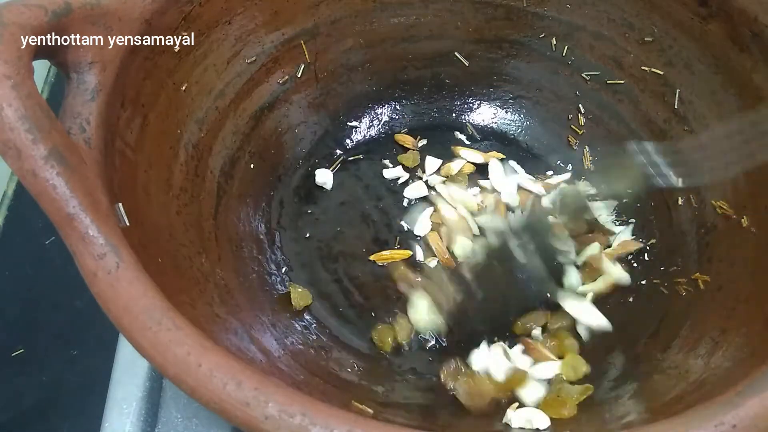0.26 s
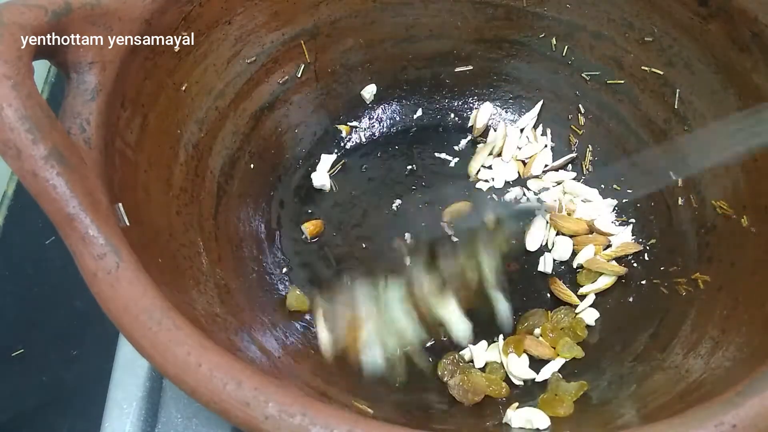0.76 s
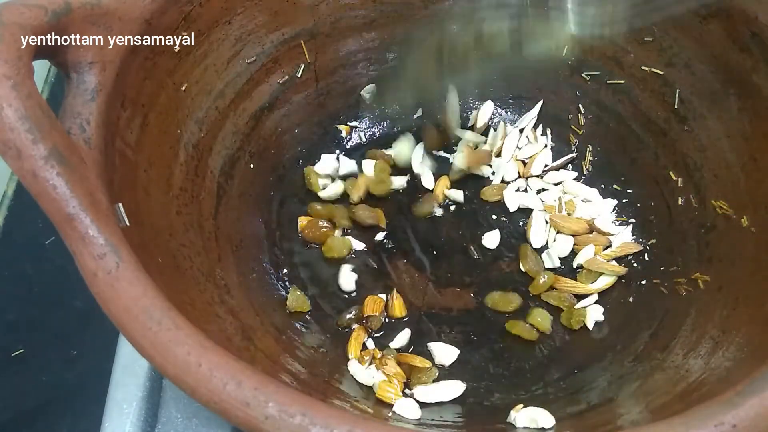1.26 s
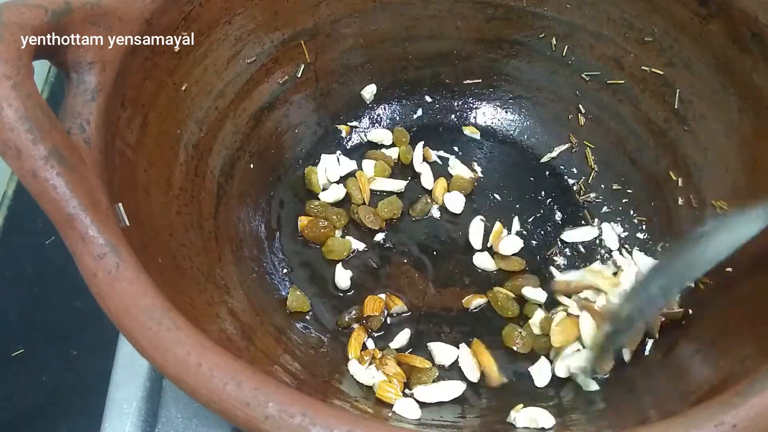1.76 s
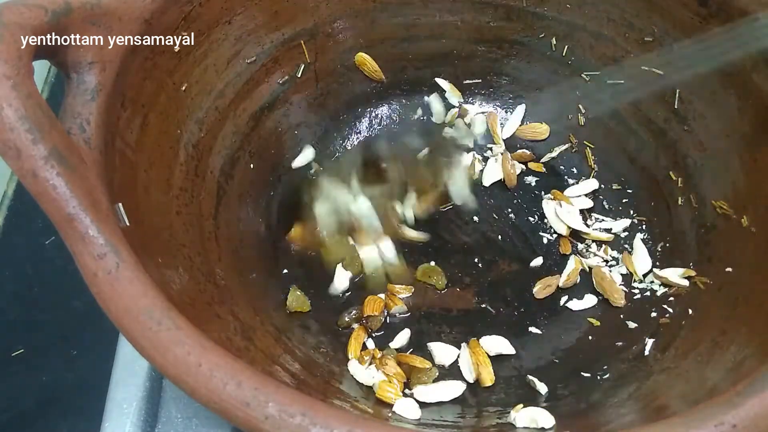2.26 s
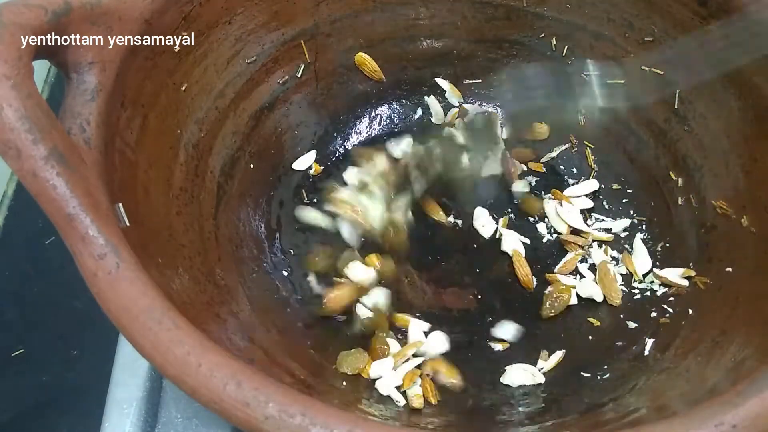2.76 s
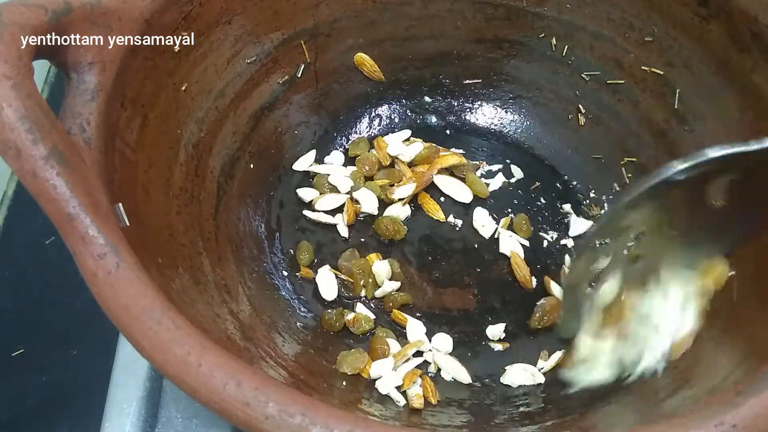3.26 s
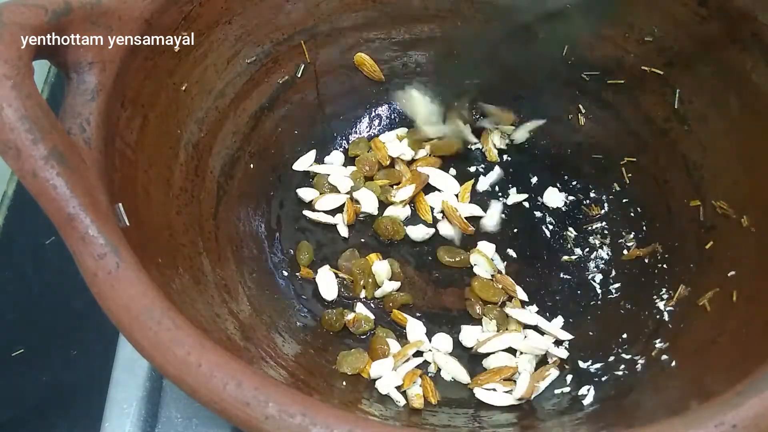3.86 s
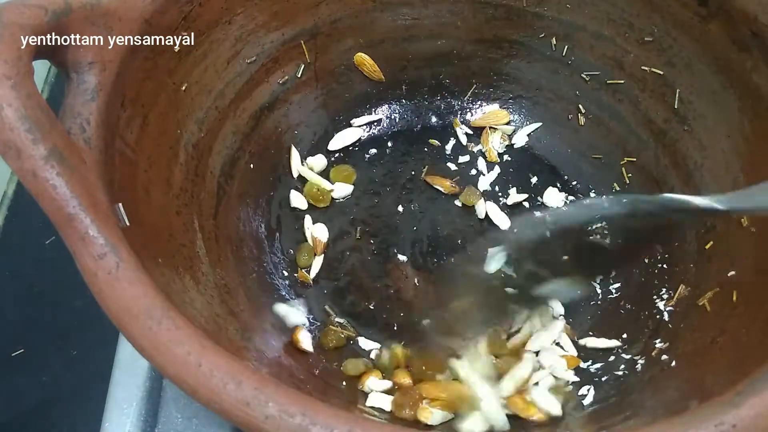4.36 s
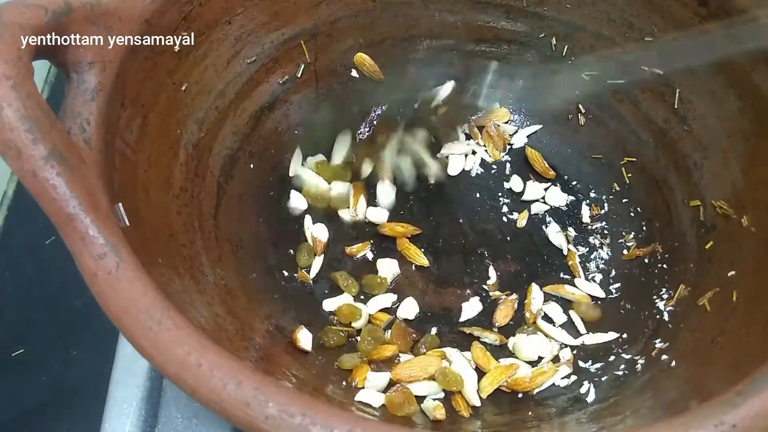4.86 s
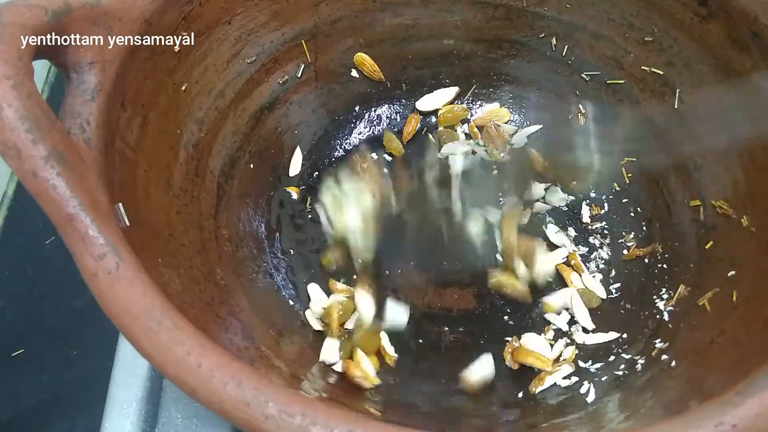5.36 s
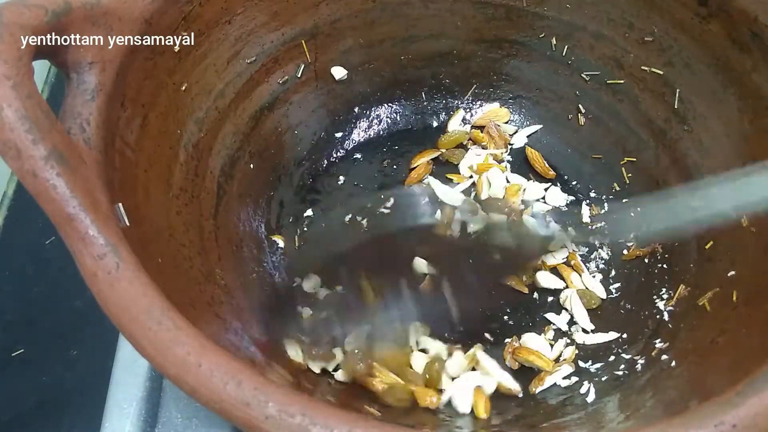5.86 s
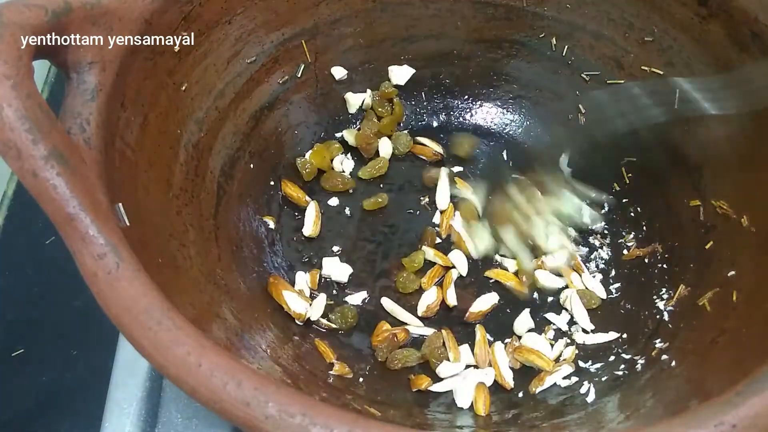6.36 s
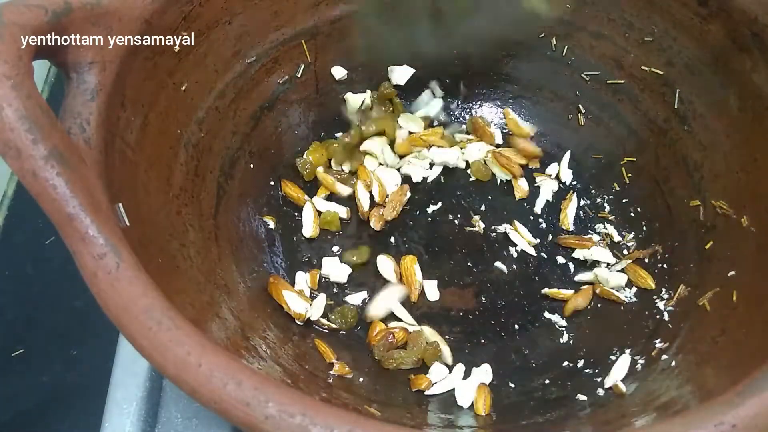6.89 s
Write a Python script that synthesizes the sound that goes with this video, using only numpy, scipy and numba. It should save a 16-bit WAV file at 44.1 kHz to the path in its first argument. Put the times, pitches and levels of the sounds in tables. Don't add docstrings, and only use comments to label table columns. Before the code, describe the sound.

A metal spoon knocks and scrapes grittily around a clay pot in quick steady strokes, nuts ticking and tumbling over a faint burner flame.

```python
import sys
import numpy as np
from scipy import signal
from scipy.fft import rfft, irfft, next_fast_len
from scipy.io import wavfile
from scipy.ndimage import uniform_filter1d
from numba import njit

SR = 44100
rng = np.random.default_rng(int(sys.argv[2]) if len(sys.argv) > 2 else 0)


def elevation(decibels):
    levels = np.asarray(decibels, float)
    return 10 ** (levels / 20)


def bounce(signal):
    frames = np.transpose(np.atleast_2d(signal))
    limited = np.clip(frames, -1, 1)
    pcm = np.round(limited * 32767).astype(np.int16)
    wavfile.write(sys.argv[1], SR, pcm)


N = 314433
SIZE = next_fast_len(N + SR)
HZ = np.maximum(np.arange(SIZE // 2 + 1) * SR / SIZE, 1)

# (time [s], glaze [dB], pot [dB], spoon ring [dB], clack [Hz])
KNOCKS = [(0.4413, -26, -33, -43.5, 1930), (0.7651, -25, -36.5, -40.5, 2830),
          (0.7773, -30.5, -42, -41.5, 3050), (0.8481, -34.5, -31.5, -42, 3380),
          (1.158, -26.5, -38, -48.5, 3220), (1.5471, -24, -38, -32, 2780),
          (1.6407, -23.5, -35, -49.5, 1940), (2.0569, -38, -37, -43.5, 3700),
          (2.368, -38.5, -52, -47, 3550), (2.784, -21, -32, -65, 3520), (3.3488, -32, -38, -47, 3450),
          (3.3706, -26.5, -39, -43.5, 3380), (3.762, -22, -38, -51, 3120),
          (4.2279, -59.5, -55, -53.5, 3700), (4.2393, -36, -41.5, -45, 2850),
          (4.742, -27.5, -33.5, -37, 3370), (5.0181, -30.5, -39, -38, 5460),
          (5.4008, -24.5, -37, -42.5, 3180), (5.7686, -28, -42, -37, 2660), (5.838, -44, -46, -43.5, 3100),
          (6.112, -28, -34, -63, 3450), (6.4626, -30.5, -37.5, -45, 2750), (6.5072, -25, -32, -48, 2430),
          (6.8349, -23.5, -38.5, -64, 3460)]
# (time [s], glaze [dB], bottom [dB], wall [dB], clack [Hz])
BUMPS = [(0.0306, -35, -58, -46, 5560), (0.0605, -36, -48, -46, 5600), (0.097, -33, -59, -33, 3250),
         (0.1103, -49, -58, -43, 3540), (0.122, -38, -39, -48, 2720), (0.818, -39, -63, -65, 5400),
         (0.9048, -51, -35, -43.5, 2900), (2.389, -36, -40, -48, 3210), (2.4071, -44, -47, -39.5, 5700),
         (2.4862, -35, -60, -47, 3780), (2.5145, -36.5, -34.5, -39, 3540),
         (2.5244, -39.5, -38, -45.5, 3300), (3.8836, -37.5, -45, -62, 3000),
         (4.3255, -48.5, -38, -38.5, 2820), (4.3347, -38, -56, -37.5, 2700), (5.0301, -34, -46, -52, 3750),
         (5.146, -37, -48, -37, 3680), (5.1527, -41, -39, -54, 3430), (5.5093, -42, -54, -59, 5580),
         (6.4841, -37.5, -35, -47.5, 2850), (6.9041, -39, -35.5, -42.5, 1830),
         (1.57, -39, -46, -46.5, 3470), (3.36, -35, -46, -43.5, 5140), (3.3847, -43, -45, -38.5, 3180)]
# (time [s], level [dB], clack [Hz])
TICKS = [(0.2695, -43.5, 3500), (0.313, -50.5, 3475), (0.332, -51.5, 3530), (0.8947, -47, 2850),
         (1.4878, -55, 3370), (1.9875, -51, 3440), (2.207, -41.5, 3120), (2.3201, -48, 3180),
         (2.473, -42, 3960), (2.5916, -48, 3260), (3.0424, -52.5, 3300), (3.244, -61.5, 3550),
         (4.0694, -50, 2960), (4.1, -53.5, 3070), (4.1228, -51, 3200), (4.36, -37, 3120),
         (4.6246, -45, 3170), (5.2605, -46, 3330), (6.0217, -51, 2900), (6.761, -55, 3040),
         (1.1744, -36.5, 3220), (3.0702, -59, 3440), (3.1512, -71, 3470), (4.588, -57, 3390),
         (4.715, -40.5, 5550), (5.8637, -43.5, 2990), (6.1301, -41.5, 3260), (6.9147, -43, 3430)]
BUMP_RING_DB, TICK_BOTTOM_DB, TICK_WALL_DB, TICK_RING_DB = -17, -21.5, -14, -24.5

# (hardest [s], lifted [s], bottom [dB], wall [dB], glaze [dB])
STROKES = [(0.054, 0.35, -43.5, -39, -46), (0.488, 0.71, -50.5, -46, -50.5), (0.9, 1.084, -50, -46.5, -51),
           (1.162, 1.384, -55.5, -48, -45.5), (1.69, 1.93, -56, -51, -57),
           (2.081, 2.287, -56.5, -49.5, -53.5), (2.51, 2.735, -50, -47, -52.5),
           (2.88, 3.094, -56.5, -55.5, -55.5), (3.42, 3.584, -56, -51.5, -55.5),
           (3.912, 4.13, -53.5, -48, -53), (4.324, 4.523, -48.5, -44, -50.5),
           (4.748, 5.01, -51.5, -42.5, -45), (5.156, 5.374, -46, -43.5, -52),
           (5.549, 5.774, -57.5, -51.5, -56.5), (5.88, 6.05, -57, -52.5, -56),
           (6.163, 6.42, -48.5, -49.5, -56), (6.519, 6.77, -57, -49, -56), (6.917, 7.107, -53.5, -51, -51)]
# (from [s], to [s], first level [dB], last level [dB], steel edge [dB])
ROLLS = [
    (0.365, 0.432, -82, -53.5, -5),
    (1.97, 2.058, -71.5, -70, -3),
    (2.313, 2.361, -67, -77, 2),
    (3.15, 3.24, -73, -85, -2),
    (3.24, 3.355, -79.5, -73, 5.5),
    (4.619, 4.737, -72, -58, -5),
]
# (bottom, wall, glaze, steel edge [dB/s])
SWELL_DB_PER_S = [34, 45, 17, 15]
# (bottom, wall, glaze, steel edge [dB/s])
FADE_DB_PER_S = [83, 94, 85.5, 114]
# (bottom, wall, glaze, steel edge [dB])
SKID_DB = [-10.5, -8.5, -19, 0]
# (bottom, wall, glaze [dB])
ROLL_DB = [4, -2, -1.5]
LIFT_DB_PER_S, SKID_T60_S, EDGE_DB = 355, 0.11, -5.5
LEAD_DB, LEAD_T60_S = -27.5, 0.015

# (time [s], level [dB], fade [dB/s])
SINGS = [
    (0.885, -51.5, 86),
    (1.165, -52.5, 116),
    (2.062, -56, 100),
    (2.79, -48, 130),
    (4.335, -49, 99),
    (4.751, -37, 115),
    (5.405, -52, 120),
    (6.118, -48, 140),
]
SING_RISE_S = 0.0062

# (frequency [Hz], level [dB], t60 [s])
BOTTOM_MODES = [(244, -2.5, 0.25), (330, -3, 0.11), (409, -6, 0.027), (463, 4, 0.07), (529.5, 10, 0.038),
                (633, 10.5, 0.025), (703.5, 6.5, 0.023), (808.7, -3.5, 0.053)]
# (frequency [Hz], level [dB], t60 [s])
WALL_MODES = [(1060, -5, .05), (1143, 0, .09), (1200, -3, .05), (1380, -6, .03), (1860, -5, .02),
              (2100, -1, .035), (2240, -3, .03)]
# (frequency [Hz], level [dB], t60 [s])
GLAZE_MODES = [(2900, 0.5, 0.021), (3260, 0.5, 0.026), (3420, -1, 0.015), (3750, -3.5, 0.0072),
               (4820, -0.5, 0.0068), (5220, -6, .012), (5650, 6, 0.023)]
# (frequency [Hz], level [dB], t60 [s])
SPOON_MODES = [(6950, 0, .11), (7270, -1, .11), (7600, -4, .08), (8220, -6, .08), (8800, -8, .05),
               (9070, -4, .09), (10100, -12, .05), (10350, -10, .06), (10720, -8, .08), (11570, -14, .06),
               (12280, -13, .06), (12670, -15, .06), (13150, -15, .06), (13900, -11, .05), (14900, -8, .05),
               (15400, -5, .05)]

# (frequency [Hz], t60 [s])
KITCHEN_T60 = [(100, 0.8), (500, 0.45), (2000, 0.58), (6000, 0.31), (14000, 0.31)]
# (frequency [Hz], density [dB/Hz])
BURNER_ROAR = [(30, -19.5), (90, -31.5), (130, -15.5), (200, -17.5), (500, -27.5), (1500, -12.5),
               (4000, -31), (15000, -26)]
# (frequency [Hz], width [Hz], level [dB])
BURNER_DRONE = [(137, 9, -1.5), (180, 9, -3)]
BURNER_DB = -5.5
FLAME_DB, FLAME_KNEE_DB, FLAME_SLOPE, FLAME_RISE_S, FLAME_FALL_S = -68.5, -52, 0.41, 0.095, 0.03

# (frequency [Hz], difference [dB])
PORT_BALANCE = [(100, 1.5), (300, 0.5), (520, 6), (1000, -4.5), (2100, -3), (3000, -2), (5500, 1),
                (7000, -8), (11000, -2.5), (15000, -7)]
# (frequency [Hz], share [0-1])
PORT_ALIKE = [(60, 0.6), (150, 0.85), (500, 0.65), (1200, 0.25), (3000, 0.03), (8000, 0), (15000, 0)]
# (frequency [Hz], gain [dB])
PORT_COLOUR = [(50, 22.5), (130, 3.5), (230, 1), (500, -0.5), (1100, -1), (1700, -5), (2300, -2), (4000, 1),
               (6500, -3), (10000, -2), (15500, -19)]
# (frequency [Hz], share [0-1])
WIDEN = [(100, 0.19), (1100, 0.91), (2300, 0.78), (4560, 0.55), (8000, 0.26), (15000, 0)]
WIDEN_S, PORT_LAG_S, TOP_HZ = 1 / 2280, 13 / SR, 15750


def along(points):
    hz, value = np.transpose(points)
    return np.interp(np.log(HZ), np.log(hz), value)


def unit(x):
    return x / np.sqrt(np.mean(x ** 2))


def per_body(values):
    return np.array(values)[:, None]


@njit
def follow(x, rise, fall):
    out, level = np.empty(len(x)), x[0]
    for i in range(len(x)):
        level += (x[i] - level) * (rise if x[i] > level else fall)
        out[i] = level
    return out


def decay(x, t60_s):
    return signal.lfilter([1], [1, -elevation(-60 / (t60_s * SR))], x)


def blows():
    rows = [(s, hz, pot, pot, glaze, steel) for s, glaze, pot, steel, hz in KNOCKS]
    rows += [(s, hz, bottom, wall, glaze, glaze + BUMP_RING_DB) for s, glaze, bottom, wall, hz in BUMPS]
    rows += [(s, hz, db + TICK_BOTTOM_DB, db + TICK_WALL_DB, db, db + TICK_RING_DB) for s, db, hz in TICKS]
    return np.transpose(rows)


def knocks(chatter_s=0.00053, clack_db=9, clack_width_hz=500):
    s, clack_hz, *db = blows()
    t = np.arange(400) / SR
    spread = rfft(rng.standard_normal((len(s), len(t))) * t * np.exp(-t / chatter_s))
    spread /= np.sqrt(uniform_filter1d(np.abs(spread) ** 2, size=9))
    hz = np.arange(spread.shape[1]) * SR / len(t)
    off = 2j * (hz - clack_hz[:, None]) / clack_width_hz
    flat = irfft(spread, len(t))
    clack = irfft(spread * (1 + elevation(clack_db) / (1 + off)), len(t))
    share = elevation(np.array(db) + per_body([19.5, 25.5, 14, 26.5]))
    force = np.zeros((4, N + len(t)))
    for k, start in enumerate((s * SR).astype(int)):
        contact = np.array([flat[k], clack[k], clack[k], flat[k]])
        force[:, start:start + len(t)] += share[:, k:k + 1] * contact
    return force[:, :N]


def pressure():
    t = np.arange(N) / SR
    s, _, *db = blows()
    skid = np.zeros((4, N))
    skid[:, (s * SR).astype(int)] = elevation(np.array(db) + per_body(SKID_DB))
    power = decay(skid, SKID_T60_S) ** 2 + elevation(-220)
    lead = decay(skid[:, ::-1], LEAD_T60_S)[:, ::-1]
    power += (elevation(LEAD_DB) * lead) ** 2
    lands = np.array(KNOCKS)[:, 0]
    start = 0
    for hardest, lift, bottom, wall, glaze in STROKES:
        on = slice(int(start * SR), int((lift + 0.25) * SR))
        late = t[on] - hardest
        fall = per_body(FADE_DB_PER_S) * np.maximum(late, 0)
        fall -= per_body(SWELL_DB_PER_S) * np.minimum(late, 0)
        fall += LIFT_DB_PER_S * np.maximum(t[on] - lift, 0)
        power[:, on] += elevation(2 * (per_body([bottom, wall, glaze, glaze + EDGE_DB]) - fall))
        start = min(lands[lands > lift], default=0)
    for begin, end, first_db, last_db, steel_db in ROLLS:
        on = slice(int(begin * SR), int(end * SR))
        level_db = np.interp(t[on], [begin, end], [first_db, last_db])
        power[:, on] += elevation(2 * (level_db + per_body([*ROLL_DB, steel_db])))
    return np.sqrt(power)


def scrape(press, grains_per_s=6000, judder_db=0.5, judder_hz=60):
    hit = rng.random(N) < grains_per_s / SR
    size = elevation(1.6 * rng.exponential(size=N))
    grit = unit(hit * rng.standard_normal(N) * size)
    k = int(SR / judder_hz)
    judder = unit(uniform_filter1d(uniform_filter1d(rng.standard_normal(N), k), k))
    return grit * press * elevation(judder_db * judder)


def sing():
    t = np.arange(N) / SR
    level = np.zeros(N)
    for start, db, fade in SINGS:
        late = np.maximum(t - start, 0)
        level += elevation(db - fade * late) * np.minimum(late / SING_RISE_S, 1)
    return level * rng.standard_normal(N)


@njit
def ring(push, hz, gain, t60, which):
    out = np.zeros(len(push))
    for m in range(len(hz)):
        p, z = np.exp(2j * np.pi * hz[m] / SR - np.log(1000.) / (t60[m] * SR)), 0j
        for i in range(len(push)):
            z = z * p + push[i] * gain[which[i], m] + 1e-18
            out[i] += z.imag
    return out


def body(push, modes, lo_hz, hi_hz, rasp, spot_db=1.8, hold_s=0.04):
    hz, db, t60 = np.transpose(modes)
    t60 = np.maximum(t60, 0.004)
    stored = np.sum(elevation(2 * db) * t60 * SR / (4 * np.log(1000)))
    which = np.arange(N) // int(hold_s * SR)
    spots_db = spot_db * rng.standard_normal((which[-1] + 1, len(hz)))
    gain = elevation(db + spots_db) * np.sqrt((1 - rasp) / stored)
    raspy = push * np.sqrt(rasp * SR / 2 / (hi_hz - lo_hz))
    radiates = signal.butter(3, [lo_hz, hi_hz], "band", fs=SR, output="sos")
    return signal.sosfilt(radiates, ring(push, hz, gain, t60, which) + raspy)


def hollow(near, bounce_s=0.00071, turns_per_s=2.951):
    t = np.arange(400) / SR
    bounces = rfft(rng.standard_normal((2, len(t))) * np.exp(-t / bounce_s), SIZE)
    power = np.abs(bounces) ** 2
    bounces *= near / np.sqrt(power + 0.11 * np.mean(power))
    walk = np.cumsum(rng.standard_normal((2, SIZE)), axis=1)
    drift = uniform_filter1d(2 * np.pi * walk * np.sqrt(turns_per_s / SR), size=4000)
    turned = irfft(bounces, SIZE) * np.cos(drift) + irfft(1j * bounces, SIZE) * np.sin(drift)
    return rfft(turned)


def kitchen(near, wet_db=-11, gap_s=0.00075):
    t = np.arange(SR) / SR
    table_hz, table_s = np.transpose(KITCHEN_T60)
    tails = 0
    for hz in 90 * 2 ** np.arange(0, 8.):
        t60 = np.interp(np.log(hz), np.log(table_hz), table_s)
        octave = signal.butter(2, [hz / 2 ** 0.5, hz * 2 ** 0.5], "band", fs=SR, output="sos")
        tails = tails + signal.sosfilt(octave, rng.standard_normal((3, SR))) * elevation(-60 * t / t60)
    tails *= np.clip(t / gap_s - 1, 0, 1)
    return rfft(tails / np.sqrt(np.sum(tails ** 2) / 3), SIZE) * near * elevation(wet_db)


def burner(press):
    colour = (unit(elevation(along(BURNER_ROAR))) * elevation(BURNER_DB)) ** 2
    for hz, width, db in BURNER_DRONE:
        colour += (unit(1 / (1 + ((HZ - hz) / (width / 2)) ** 2)) * elevation(db)) ** 2
    flame = irfft(rfft(rng.standard_normal((3, SIZE))) * np.sqrt(colour), SIZE)
    press_db = 10 * np.log10(np.mean(press ** 2, axis=0))
    stir_db = follow(press_db, 1 / (FLAME_RISE_S * SR), 1 / (FLAME_FALL_S * SR))
    swell_db = FLAME_DB + FLAME_SLOPE * np.minimum(stir_db - FLAME_KNEE_DB, 0)
    return rfft(flame[:, :N] * elevation(swell_db), SIZE)


def scene():
    press = pressure()
    bottom, wall, glaze, spoon = knocks() + scrape(press)
    direct = body(bottom, BOTTOM_MODES, 259, 1700, rasp=0.16)
    direct += body(wall, WALL_MODES, 1180, 2180, rasp=0.63)
    direct += body(glaze, GLAZE_MODES, 2340, 6540, rasp=0.94)
    direct += body(spoon, SPOON_MODES, 6400, 15200, rasp=0.42, spot_db=4.0, hold_s=0.12)
    direct += body(sing(), WALL_MODES[:3], 960, 1474, rasp=0.67)
    near = rfft(direct, SIZE)
    shared, *own = kitchen(near) + burner(press)
    alike = np.clip(along(PORT_ALIKE), 0, 1)
    ports = np.sqrt(alike) * (near + shared) + np.sqrt(1 - alike) * (hollow(near) + np.array(own))
    skew = elevation(along(PORT_BALANCE) / 2) * np.exp(-1j * np.pi * HZ * PORT_LAG_S)
    return irfft(ports * np.array([skew, 1 / skew]) * elevation(along(PORT_COLOUR)), SIZE)[:, :N]


def low_pass(x):
    return signal.sosfilt(signal.butter(12, 15960, fs=SR, output="sos"), x)


def record(dry, fall_s=0.018, gate_db=-72):
    ports = rfft(dry, SIZE)
    other = np.clip(along(WIDEN), 0, 1) * np.exp(-2j * np.pi * HZ * WIDEN_S) * ports[::-1]
    wide = irfft(ports - other, SIZE)[:, :N]
    x = signal.sosfilt(signal.butter(2, 90, "high", fs=SR, output="sos"), wide)
    x = signal.sosfilt(signal.ellip(6, 0.2, 50, TOP_HZ, fs=SR, output="sos"), x)
    ahead = np.roll(np.abs(x).mean(axis=0), -130) + 1e-9
    loud = follow(ahead, 0.05, 1 / (fall_s * SR))
    gate = np.minimum(loud / elevation(gate_db), 1) ** 5
    return low_pass(x * gate)


dry = scene()
out = record(dry)
bounce(out)
```